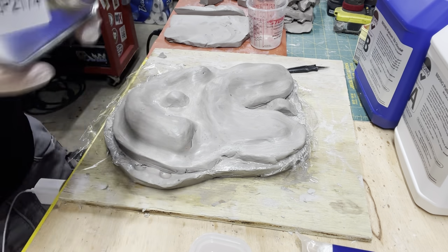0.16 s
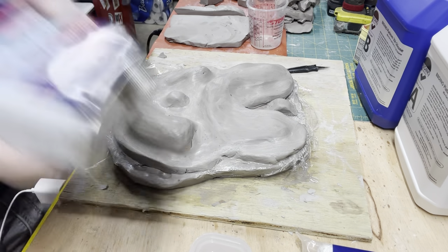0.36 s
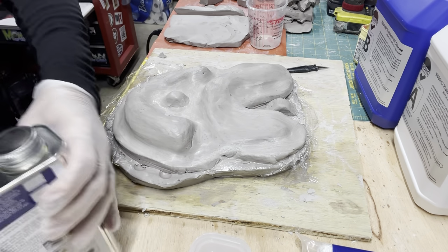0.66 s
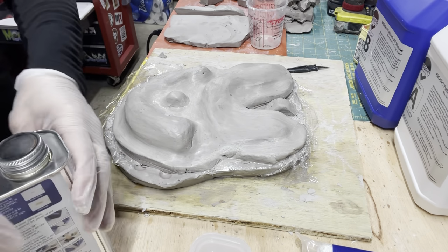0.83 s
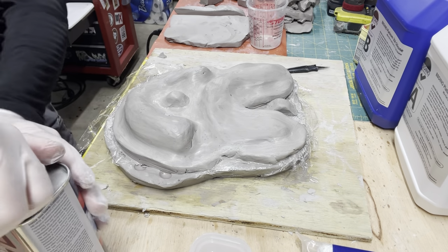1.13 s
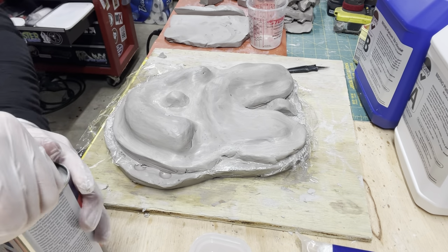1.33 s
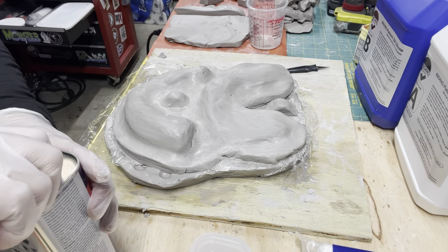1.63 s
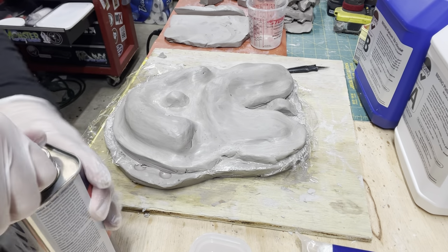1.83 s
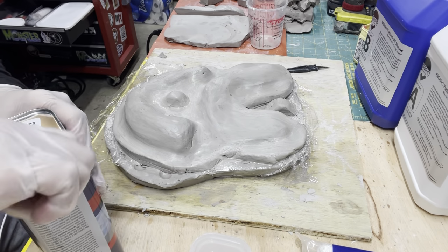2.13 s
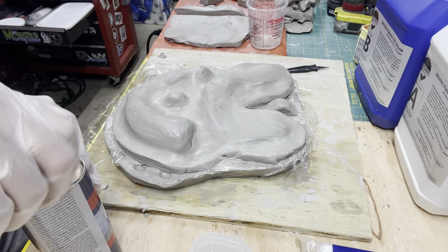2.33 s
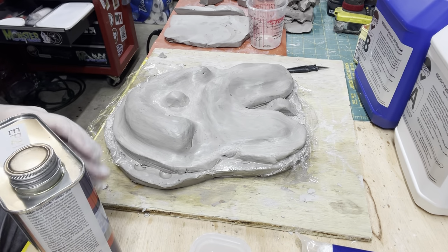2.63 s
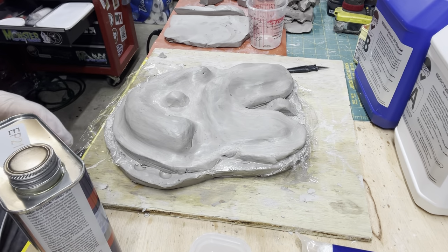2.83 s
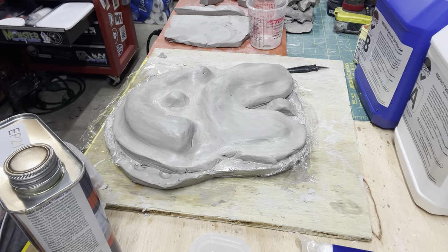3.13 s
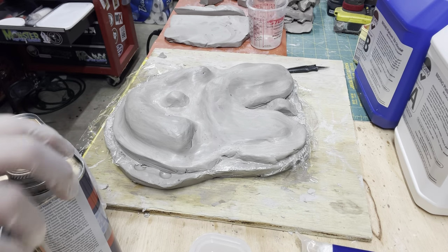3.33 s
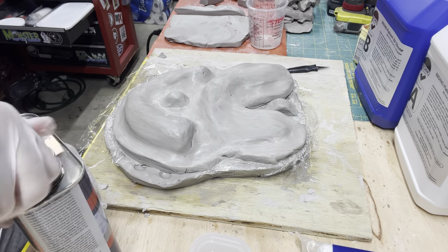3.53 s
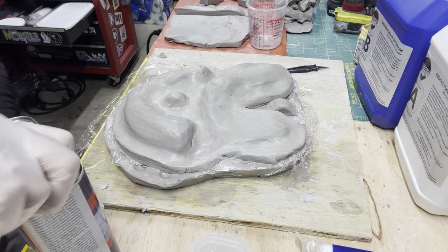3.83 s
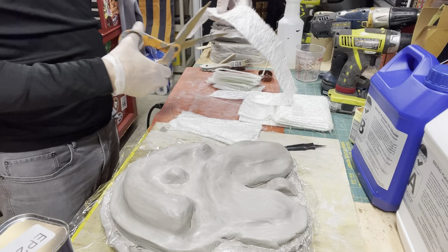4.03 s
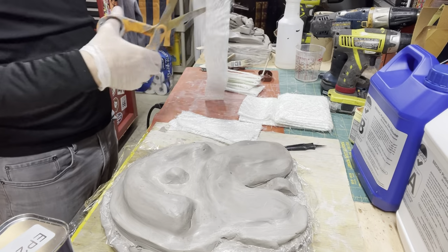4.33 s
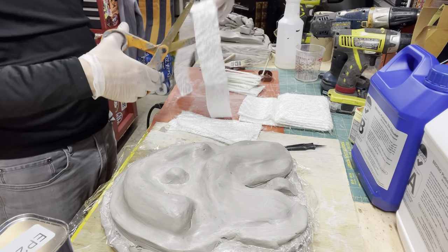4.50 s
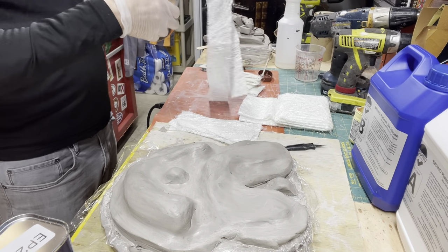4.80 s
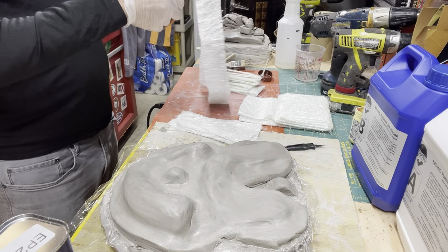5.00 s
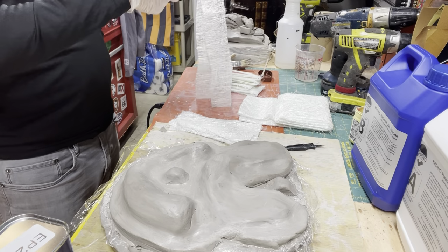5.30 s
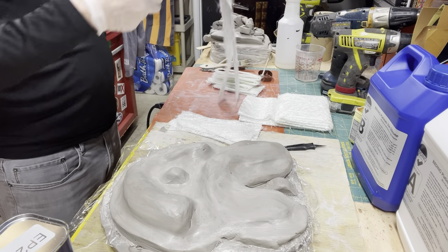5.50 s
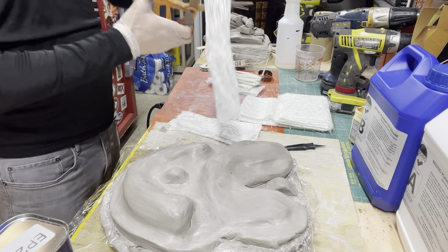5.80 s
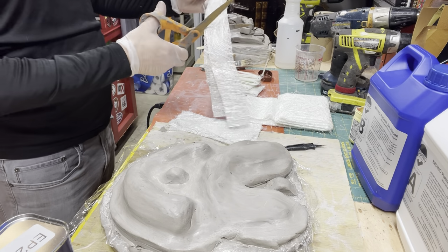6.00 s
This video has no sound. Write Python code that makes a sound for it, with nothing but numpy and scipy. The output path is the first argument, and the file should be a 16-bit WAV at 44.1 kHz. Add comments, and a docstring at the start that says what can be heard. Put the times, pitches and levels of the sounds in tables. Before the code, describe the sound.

For the first second, liquid is shaken in a tin can close to a stereo microphone: quick slaps, splashes and round, hollow gulps, loudest at about 0.7 seconds. It then rocks softly and settles while rubber gloves slide faintly over the tin. From 2.1 to 2.5 seconds a metal screw cap grinds in short turns, with a sharp click near 2.4 and a slight ring from the lid. More clicks and scrapes follow from 3.3 to 3.8 seconds. Just after 4 seconds the can sounds stop abruptly. Faint scissor ticks and a dry, grainy rustle of fibreglass mat take over, building to a brief, crunchy tear with tiny squeaks around 5.3 seconds, far quieter than the sloshing. Another light rasp comes near 6 seconds. The handling sits slightly to the right, and a low, quiet workshop rumble continues underneath.

```python
"""Solvent can and fibreglass mat at a workbench

Close to a stereo microphone, a tin can of solvent is shaken: the liquid slaps its walls and gulps,
then settles with the can upright. Gloved hands shift their grip and work the screw cap, ringing the
lid. After an abrupt change of scene, a strip of fibreglass mat rustles, is torn off and meets the
scissors. Farther off, the workshop rumbles quietly."""
import sys
import numpy as np
from scipy import signal
from scipy.fft import rfft, irfft, next_fast_len
from scipy.io import wavfile
from scipy.ndimage import uniform_filter1d, map_coordinates

SR = 44100
rng = np.random.default_rng(int(sys.argv[2]) if len(sys.argv) > 2 else 0)


def bounce(signal):
    """Save signal as a 16-bit WAV file at the path given by the first command-line argument."""
    frames = np.transpose(np.atleast_2d(signal))
    limited = np.clip(frames, -1, 1)
    pcm = np.round(limited * 32767).astype(np.int16)
    wavfile.write(sys.argv[1], SR, pcm)


N = 271215
T = np.arange(N) / SR
SCENE_CHANGE_S = 4.059
SIDES = np.array([[1], [-1]])   # left, right

# the can turning from its side to upright: t/s, left-right balance/dB, wave swell/s, ring time factor
CAN_POSE = [(0.45, -2.5, 0.0031, 0.4), (0.66, -3.5, 0.0034, 0.91), (0.8, -6, 0.004, 0.93)]
# resonances of the can's lid and neck: f/Hz, width/Hz, gain/dB
LID_RESONANCES = [(268, 88, -0.5), (408, 91, -7.5), (544.5, 99, 4.5), (784, 60, 4), (882, 120, 1),
                  (1178, 170, 1), (1490, 300, -3.5), (1803, 79, -2), (2038, 170, -1.5), (3304, 92, -4),
                  (3608, 370, -10.5), (4760, 89, -5), (8030, 70, -9.5)]


def sloshes(upright_s=.55, full_wave_db=-23, gain_db=-4.5, boom_db=-14.5, thump_db=-4.5, fall_s=.0059):
    """A wave lands as one push inside a swell of droplet impacts; the can rings as it is held."""
    # waves hitting the can: t/s, level/dB, splash re level/dB, spatter re level/dB, fine spray/dB
    waves = [(0.002, -41.5, -12.5, -3, -58), (0.054, -30.5, -2, -14, -73), (0.105, -28.5, -7, -8, -61),
             (0.173, -30, -5.5, -15.5, -43.5), (0.183, -25, -7.5, -12, -49.5),
             (0.223, -31, -3, -9.5, -52.5), (0.230, -24, -6.5, -22, -65.5), (0.293, -39.5, -17, 1.5, -57.5),
             (0.346, -28.5, -2.5, -8, -49), (0.352, -26.5, -11, -22, -58.5), (0.425, -33, -22, -34, -60),
             (0.470, -28, -28, -21, -54.5), (0.479, -39, -14.5, -24, -65.5), (0.613, -39, -4, -19.5, -63),
             (0.659, -24, 1, -15.5, -54.5), (0.662, -14.5, -7.5, -24.5, -50.5),
             (0.676, -28.5, -7, -20, -65.5), (0.684, -33.5, -7.5, -16.5, -65.5),
             (0.699, -41, -8, -15.5, -67.5), (0.78, -26, -17.5, -38, -76), (0.811, -32.5, -23, -38, -63),
             (0.856, -27.5, -13, -39, -56), (0.905, -25, -20, -28.5, -54), (0.951, -54, 3, -28, -73),
             (0.977, -46, -40, -34, -75), (1.239, -50, -18.5, -11.5, -63.5)]
    # modes of the part-filled can in each pose: f/Hz, level/dB, t60/s, balance/dB, left lead/rad
    modes_on_side = [(62, -15, .16, 2, 0), (120.3, -14, .25, 1, .1), (170, -3, 0.0411, 2.5, .1),
                     (216, -0.5, .11, -2.5, 0), (299, 1, 0.2, 0, 0.69), (391.2, -5, 0.14, 4.5, -0.07),
                     (568, -2, 0.11, 0, 0.21), (620, -4, 0.053, -2.5, -0.11), (666, -0.5, 0.032, -4.5, 1.4),
                     (854, -5.5, .05, 2, .4), (1025, -4, 0.056, -5.5, 0.46), (1110, -11.5, 0.03, 2, 0),
                     (1255, -8.5, 0.047, 1, -.2), (1426, -8, .06, -6, -0.027), (1740, -9.5, .05, 0, 0),
                     (1966, -17, 0.043, 0, -.3), (2400, -22.5, 0.065, 0.5, -.5),
                     (2940, -14.5, 0.041, -1, 0), (3340, -21.5, .04, 0, .5)]
    modes_upright = [(63, -14.5, .16, -0.5, -0.5), (92.7, -8.5, 0.097, 0, 0.2), (205, -9, 0.11, 4.5, 0.5),
                     (265.5, -3.5, 0.033, -3.5, 1.5), (374, -5, .065, -2.5, 1.5), (430, -2, 0.079, -3, 0.5),
                     (500, -10, 0.093, -0.5, -2.4), (608, -3.5, 0.058, 2.5, 1.05),
                     (737, 2, 0.033, -0.5, -1.5), (849, -6, 0.043, -1, -2.15), (935, -12, .05, 6, 3),
                     (1010, -15, .06, -1.5, 1), (1120, -9, 0.049, 9.5, 1.5), (1283, -8, 0.033, 0.5, 1),
                     (1650, -12.5, .05, 6, -1), (1710, -19, .055, -1.5, -2.5),
                     (2019, -18.5, 0.032, 2.5, -3), (2318, -14, .06, 1.5, 1.5), (2638, -21.5, .05, 1, -2.5),
                     (2900, -21, 0.074, 2.5, -2.5), (3390, -23, .05, 3, 2)]
    out, size, lead = np.zeros((2, N)), 12288, SR // 40
    t = np.arange(size) / SR
    since = t - lead / SR
    hz = np.fft.rfftfreq(size, 1 / SR) + 1
    edges_hz = [30, 90, 300, 850, 2100, 3900]   # boom, thump, body, splash, spatter
    registers = [1 / np.sqrt((1 + (lo / hz) ** 10) * (1 + (hz / hi) ** 10))
                 for lo, hi in zip(edges_hz, edges_hz[1:])]
    pose_s, *pose = np.transpose(CAN_POSE)
    for s, wave_db, splash_db, spatter_db, spray_db in waves:
        balance_db, swell_s, ring_factor = (np.interp(s, pose_s, column) for column in pose)
        impacts = .17 * rng.standard_normal(size) * swell(since, swell_s, fall_s)
        impacts[lead] += 2   # the main push
        # the many droplets drive all pitches about equally, so the can sets the colour
        push = rfft(impacts)
        push /= np.sqrt(uniform_filter1d(np.abs(push) ** 2, size=91) + 1e-12)
        # a light wave wets and loads another part of the wall each time
        shift = .02 * rng.standard_normal() * (wave_db < full_wave_db)
        modes = modes_on_side if s < upright_s else modes_upright
        struck = rfft(can_walls(t, modes, shift, ring_factor)) * push
        # a broad wave gives a thump, a breaking crest gives splash and spatter
        levels_db = wave_db + gain_db + np.array([boom_db, thump_db, 0, splash_db, spatter_db])
        blow = sum(at_level(irfft(struck * register), db) for register, db in zip(registers, levels_db))
        # the finest droplets tick sharply against the tin
        drops = noise(.64, size) * swell(since, rise_s=.0036, fall_s=.004)
        spray = at_level(band(drops, 3800, 7600), spray_db + gain_db)
        add(out, pan(balance_db) * (blow + spray), s - lead / SR)
    return out


def can_walls(t, modes, shift, ring_factor, detune=.01407, froth_s=.0055):
    """The walls ring under a burst of froth; each mode reaches the two microphone sides in its own way."""
    hz, db, t60_s, balance_db, lead_rad = np.transpose(modes)[:, :, None]
    pitch_hz = hz * (1 + shift + detune * rng.standard_normal(hz.shape))
    strength = from_db(db + 1.3 * rng.standard_normal(hz.shape))
    decay = strength * from_db(-60 * t / (t60_s * ring_factor))
    phase = 2 * np.pi * pitch_hz * t
    tones = [from_db(side * balance_db) * decay * np.sin(phase + side * lead_rad) for side in (.5, -.5)]
    froth = .42 * noise(.84, len(t)) * np.exp(-t / froth_s)
    return np.sum(tones, axis=1) + froth


def gulps(lean_db=3.5, glide=.043, hum_db=-14.5, hum_s=.023):
    """A trapped pocket of air swells into a round, rising tone; the can hums on after it."""
    # air pockets in the liquid, and two hollow knocks as the cap turns (3.43 s, 3.496 s): t/s, f/Hz, level/dB,
    # swell/s
    pockets = [(0.003, 237.1, -26.5, 0.0035), (0.034, 218, -28, 0.0084), (0.061, 202.6, -20.5, 0.0071),
               (0.108, 184.8, -13, 0.0053), (0.138, 208.7, -37, 0.0055), (0.185, 196.7, -13.5, 0.0033),
               (0.228, 252.1, -18, 0.0048), (0.307, 182, -31, 0.0076), (0.346, 239.7, -20.5, 0.0048),
               (0.353, 115, -28.5, 0.018), (0.375, 200, -38, 0.0086), (0.488, 193.7, -26, 0.0099),
               (0.663, 184, -13, 0.006), (0.666, 373.4, -14.5, 0.0087), (0.689, 205.6, -30, 0.0096),
               (0.68, 98.7, -29, 0.0099), (0.784, 261.6, -33, 0.009), (0.811, 106.4, -34, 0.018),
               (0.86, 237, -27, 0.0065), (0.861, 102.5, -29.5, 0.012), (0.913, 403.3, -30.5, 0.0084),
               (0.923, 100.4, -38, 0.018), (0.982, 208.7, -39.5, 0.0075), (1.244, 382, -47.5, 0.01),
               (3.43, 122.3, -43.5, 0.0094), (3.496, 270.7, -45.5, 0.0042)]
    out, since = np.zeros((2, N)), np.arange(-SR // 20, SR // 5) / SR
    pose_s, pose_balance_db = np.transpose(CAN_POSE)[:2]
    for s, hz, db, swell_s in pockets:
        balance_db = lean_db + np.interp(s, pose_s, pose_balance_db)
        shrink = np.tanh(since / swell_s)
        tone = np.sin(2 * np.pi * np.cumsum(hz * (1 + glide * shrink)) / SR + rng.uniform(0, 2 * np.pi))
        gulp = np.exp(-(since / swell_s) ** 2)
        hum = from_db(hum_db) * np.maximum(shrink, 0) * np.exp(-np.abs(since) / hum_s)
        add(out, from_db(db) * (gulp + hum) * tone * pan(balance_db), s + since[0])
    return out


def bubbles(onset_s=.0011, rise_per_s=1.5):
    """Each bubble pops with a few cycles that rise a little in pitch."""
    # bubbles in a breaking crest: t/s, f/Hz, level/dB, decay/s
    pops = [(0.171, 1082, -19, .004), (0.226, 1250, -19.5, 0.0033), (0.3455, 1500, -11.5, 0.0019),
            (0.422, 1380, -40.5, 0.0026), (0.465, 1373, -37, 0.0059)]
    out, t = np.zeros((2, N)), np.arange(SR // 16) / SR
    for s, hz, db, decay_s in pops:
        tone = np.sin(2 * np.pi * hz * t * (1 + rise_per_s * t / 2))
        envelope = (1 - np.exp(-t / onset_s)) * np.exp(-t / decay_s)
        add(out, from_db(db) * envelope * tone * pan(0), s)
    return out


def sway(gain_db=-3):
    """After each jolt the liquid rocks softly against the walls and comes to rest."""
    # jolts of the can: t/s, level/dB
    jolts = [(0, -42.5), (0.66, -46.5), (1.24, -61), (1.87, -54), (2.17, -51.5), (2.679, -74), (3.36, -53)]
    # spectrum of the rocking liquid: f/Hz, level/dB
    colour = [(110, 0), (200, -4.5), (270, -3), (320, -8), (390, 1), (480, -8), (610, -0.5), (760, -14.5),
              (1100, -27.5)]
    power = sum((from_db(db) * swell(T - s, rise_s=.033, fall_s=.51)) ** 2 for s, db in jolts)
    return from_db(gain_db) * np.sqrt(power) * coloured(noise(.84), colour) * pan(-2)


def gloves(rub_db=1.5, tin_db=-2.5):
    """Rubber slides over the tin, which answers faintly."""
    # slides of the gloves: t/s, length/s, rub level/dB, tin offset/dB
    slides = [(0.0, 0.27, -66.5, 4), (0.088, 0.013, -57.5, -23), (0.37, 0.17, -65, 1),
              (0.205, 0.017, -53.5, 9), (0.325, 0.017, -58.5, 7), (0.58, 0.052, -64, 12),
              (0.64, 0.098, -65.5, -6), (0.76, 0.016, -59, -26), (0.845, 0.14, -62, 4),
              (1.03, 0.25, -68, 3), (1.365, 0.1, -62, 1), (1.41, 0.039, -57.5, 1.5),
              (1.48, 0.087, -65.5, 3.5), (1.665, 0.024, -67, 12), (1.705, 0.031, -71.5, 6),
              (1.835, 0.084, -64, 9.5), (1.95, 0.064, -71, -3), (2.057, 0.037, -63, 3),
              (2.11, 0.018, -63, 9), (2.25, 0.13, -68.5, 0), (2.465, 0.036, -71, 16),
              (2.52, 0.085, -75.5, 6), (2.595, 0.04, -64, -5.5), (2.71, 0.028, -61, 4),
              (2.805, 0.0049, -69, -21), (2.925, 0.012, -72, -22), (2.97, 0.017, -88.5, -14),
              (3.03, 0.023, -73.5, -15), (3.155, 0.012, -78, -18), (3.24, 0.0092, -70.5, -8),
              (3.27, 0.11, -72, -10), (3.51, 0.037, -60.5, -17), (3.675, 0.035, -70.5, 10),
              (3.76, 0.023, -62, -1.5), (3.82, 0.11, -71.5, 3), (3.98, 0.042, -63, -2)]
    # spectrum of rubber on tin: f/Hz, level/dB
    colour = [(2000, -7.5), (3000, 2.5), (4500, -1), (6300, 2), (8000, 1.5), (11000, 1.5), (13500, 1.5),
              (15800, -1.5)]
    rub, tin = strokes(slides, attack_s=.0013, build_db=0, release_s=.00538)
    slips = friction(slips_per_s=340, grain_db=1.5, width=.059)
    slips = moving_contact(slips, depth_db=3.5, patch_hz=592.6, hold_s=.067)
    drive = friction(slips_per_s=500, grain_db=4, width=.83)
    hiss = from_db(rub_db) * rub * coloured(slips, colour)
    lid = from_db(tin_db) * tin * unit_power(resonate(drive, LID_RESONANCES))
    return hiss * pan(-3) + lid * pan(-2.5)


def screw_cap(rub_db=-.5):
    """The metal cap grinds round its thread and drives the lid, which the gripping hand damps."""
    # turns of the cap: t/s, length/s, rub level/dB, tin offset/dB
    turns = [(2.146, 0.029, -48, 3), (2.192, 0.023, -42.5, 0), (2.376, 0.019, -51.5, 7.5),
             (2.418, 0.022, -39.5, -4.5), (2.446, 0.017, -53, 6), (3.372, 0.025, -47, 2.5),
             (3.412, 0.019, -43, -0.5), (3.452, 0.028, -48.5, -0.5), (3.566, 0.015, -52, -29),
             (3.6, 0.024, -56, 4), (3.633, 0.025, -50, 1.5), (3.731, 0.015, -53, -15)]
    # spectrum of the thread, and the hand's filtering of the lid: f/Hz, level/dB
    thread_colour = [(1500, -11), (2500, 3.5), (3800, 3.5), (4900, 6.5), (5500, 4), (6300, 6.5),
                     (7700, -0.5), (9000, -18), (10200, 7), (11800, -5), (13600, 1.5), (15800, -6)]
    grip_colour = [(250, -2), (560, -3), (900, -1.5), (1400, 2.5), (2100, 4), (2600, -1.5), (4000, -7),
                   (9000, 4)]
    rub, tin = strokes(turns, attack_s=.003, build_db=2, release_s=.0029)
    slips = friction(slips_per_s=220, grain_db=1.5, width=.67)
    slips = moving_contact(slips, depth_db=7.5, patch_hz=277, hold_s=.035)
    drive = friction(slips_per_s=420, grain_db=2.5, width=.54)
    drive = moving_contact(drive, depth_db=3, patch_hz=180, hold_s=.03)
    hiss = from_db(rub_db) * rub * coloured(slips, thread_colour)
    lid = tin * coloured(resonate(drive, LID_RESONANCES), grip_colour)
    return hiss * pan(-2) + lid * pan(-3)


def fibreglass_mat(fibre_db=4, crunch_db=-7, ring_db=-1.5):
    """Glass fibres brush each other with a grainy rasp and crunch as they part."""
    # pulls and brushes of the mat: t/s, length/s, hiss level/dB, crunch offset/dB
    pulls = [(4.125, .015, -74, -9.5), (4.21, 0.076, -85, -18), (4.39, 0.05, -76, -1.5),
             (4.47, 0.043, -74, -31), (4.54, 0.02, -65, -22.5), (4.788, 0.026, -61, -15.5),
             (4.926, .012, -62.5, -11), (4.947, 0.011, -59, -7), (4.975, 0.031, -63, -5),
             (5.012, 0.016, -59, -6.5), (5.07, 0.015, -67, -5.5), (5.109, 0.011, -61.5, -15),
             (5.145, 0.014, -61, -7.5), (5.186, 0.026, -62.5, -11), (5.222, 0.061, -56, -6.5),
             (5.278, .012, -47, -9), (5.295, 0.017, -42.5, -9), (5.34, 0.062, -70, -1),
             (5.408, 0.013, -48.5, -1.5), (5.48, 0.17, -77.5, -11), (5.69, 0.056, -73, -18),
             (5.82, .06, -78.5, -5), (5.915, 0.023, -64.5, -3), (5.975, 0.025, -58, -3.5),
             (6.005, 0.048, -58.5, 0.5)]
    # spectra of brushing and of parting fibres: f/Hz, level/dB
    fibre_colour = [(2000, -37), (3500, -13), (4300, -7), (5300, -13), (6300, -4), (6850, -7.5),
                    (7400, -1.5), (8300, 2.5), (10000, 0.5), (10500, 1.5), (11100, 2.5), (11900, 3),
                    (12900, -2), (15500, 1)]
    crunch_colour = [(600, 4.5), (1400, -9.5), (2100, 0.5), (2900, 0), (3400, -3.5), (4200, 9), (5300, -17),
                     (9000, -14)]
    # resonances of the crunching strip: f/Hz, width/Hz, gain/dB
    strip_resonances = [(1430, 89, -17), (2720, 110, -3), (3300, 740, 0), (3770, 310, 2), (4314, 220, -4),
                        (6740, 960, -4.5)]
    fibres, crunch = strokes(pulls, attack_s=.003, build_db=.5, release_s=.011)
    rasp = friction(slips_per_s=330, grain_db=3.5, width=.25) + crackle(snaps_per_s=800, spread_db=3.5)
    brushing = moving_contact(rasp, depth_db=4, patch_hz=330, hold_s=.046)
    parting = noise(.69) + 1.5 * crackle(snaps_per_s=520, spread_db=3.2)
    parting = moving_contact(parting, depth_db=4, patch_hz=281, hold_s=.044)
    flexing = moving_contact(crackle(snaps_per_s=600, spread_db=3), depth_db=4, patch_hz=300, hold_s=.04)
    hiss = from_db(fibre_db) * fibres * coloured(brushing, fibre_colour)
    snaps = from_db(crunch_db) * crunch * coloured(parting, crunch_colour)
    ring = from_db(ring_db) * crunch * unit_power(resonate(flexing, strip_resonances))
    return hiss * pan(-2) + (snaps + ring) * pan(-3.5)


def knocks(gain_db=-1, rise_s=.0036):
    """Cap, fingers and scissors make short scuffing contacts: a bright tick over a hollow knock."""
    # light contacts: t/s, knock level/dB, low edge/Hz, high edge/Hz, tick level/dB, decay/s
    touches = [(1.054, -57, 185, 2750, -53, 0.0069), (2.11, -55, 550, 1800, -69, 0.0075),
               (2.274, -55.5, 700, 1500, -78, 0.0055), (2.36, -35, 550, 1400, -37.5, 0.0052),
               (2.714, -46.5, 635, 870, -68.5, 0.0023), (2.814, -59, 185, 594, -79, 0.0068),
               (3.237, -73.5, 900, 2200, -59.5, 0.018), (3.341, -46, 596, 1250, -61, 0.0042),
               (3.369, -41.5, 1160, 2390, -37.5, 0.007), (3.513, -56, 1820, 3800, -66, 0.009),
               (3.736, -58, 1920, 4200, -58, 0.01), (3.761, -55.5, 352, 1106, -56, 0.0097),
               (4.315, -73.5, 186, 2990, -69, 0.0056), (4.386, -62, 185, 1790, -67, 0.014),
               (5.108, -84, 186, 3090, -68.5, 0.0038), (5.611, -79.5, 185, 2970, -60.5, 0.0071)]
    out, lead = np.zeros((2, N)), SR // 100
    since = (np.arange(SR // 8) - lead) / SR
    for s, knock_db, lo_hz, hi_hz, tick_db, decay_s in touches:
        contact = noise(.74, len(since)) * swell(since, rise_s, decay_s)
        on_can = s < SCENE_CHANGE_S
        struck = resonate(contact, LID_RESONANCES) + .56 * contact if on_can else contact
        knock = at_level(band(struck, lo_hz, hi_hz), knock_db + gain_db)
        tick = at_level(band(contact, 4700, 13200), tick_db + gain_db)
        add(out, knock + tick, s - lead / SR)
    return out * pan(-2)


def squeaks():
    """The cap's thread or the parting strip sticks, slips and chirps for an instant."""
    # stick-slip chirps: t/s, f/Hz, half width/Hz, level/dB, rise and decay/s
    chirps = [(4.051, 2860, 231, -54, 0.0031), (4.956, 1856, 121, -78, 0.009),
              (5.309, 1425, 130, -62, 0.016), (5.41, 2740, 130, -56.5, 0.0066),
              (5.418, 1525, 141.5, -60, 0.0096), (5.71, 1234, 202, -77, 0.0075),
              (5.751, 2017, 260, -76, 0.012)]
    out, since = np.zeros((2, N)), np.arange(-SR // 10, SR // 10) / SR
    for s, hz, half_hz, db, fade_s in chirps:
        chirp = band(noise(.32, len(since)), hz - half_hz, hz + half_hz)
        add(out, at_level(chirp * swell(since, fade_s, fade_s), db), s + since[0])
    return out


def strokes(rows, attack_s, build_db, release_s):
    """Each stroke sets in, gains build_db with the pressure and lets go; gives hiss and body gains."""
    power = np.zeros((2, N))
    for start_s, length_s, db, offset_db in rows:
        span = slice(max(int((start_s - .1) * SR), 0), int((start_s + length_s + .2) * SR))
        since = T[span] - start_s
        ease_s = .21 * min(length_s, .15)   # a long stroke starts and ends more gently
        onset = since / (attack_s + ease_s)
        release = (length_s - since) / (release_s + ease_s)
        edges = np.exp(np.minimum(np.minimum(onset, release), 0))
        pressure = from_db(build_db * (np.clip(since / length_s, 0, 1) - 1.5))
        power[:, span] += (from_db([[db], [db + offset_db]]) * edges * pressure) ** 2
    return np.sqrt(power)


def friction(slips_per_s, grain_db, width):
    """Countless tiny slips: noise whose strength changes from one catch to the next."""
    catches_s = np.cumsum(rng.exponential(1, 20000)) / slips_per_s
    hiss = noise(width)
    strength = np.clip(rng.standard_normal(len(catches_s)), -2, 2)
    return unit_power(hiss * from_db(grain_db * np.interp(T, catches_s, strength)))


def crackle(snaps_per_s, spread_db):
    """Single fibres snap at random: lone clicks of uneven size, each from its own direction."""
    snapping = rng.random(N) < snaps_per_s / SR
    sizes = from_db(spread_db * np.minimum(rng.exponential(1, N), 3))
    clicks = snapping * sizes * rng.choice([-1, 1], N)
    return unit_power(clicks * (1 + .89 * rng.standard_normal(N) * SIDES))


def moving_contact(x, depth_db, patch_hz, hold_s):
    """The point of contact moves, so patches of the spectrum grow and fade, each on its own."""
    hz, s, frames = signal.stft(x, SR, nperseg=512)
    patches = rng.standard_normal((300, 700))
    grid = np.meshgrid(hz / patch_hz, s / hold_s, indexing="ij")
    swing = map_coordinates(patches, grid, order=1, mode="mirror")
    _, shifted = signal.istft(frames * from_db(depth_db * swing), SR)
    return unit_power(shifted[:, :N])


def resonate(x, resonances):
    """A body's resonances ring in parallel, with alternating signs."""
    out = 0
    for k, (hz, width_hz, db) in enumerate(resonances):
        radius = np.exp(-np.pi * width_hz / SR)
        gain = (1 - radius ** 2) / 2
        feedback = [1, -2 * radius * np.cos(2 * np.pi * hz / SR), radius ** 2]
        out += (-1) ** k * from_db(db) * signal.lfilter([gain, 0, -gain], feedback, x)
    return out


def room(x, wet_db=-23, top_hz=5000, t60_s=.25, delay_s=.008):
    """The workshop returns a short diffuse tail, different on each side."""
    t = np.arange(SR // 2) / SR
    tail = band(rng.standard_normal((2, len(t))), 80, top_hz) * from_db(-60 * t / t60_s) * (t > delay_s)
    tail /= np.sqrt(np.sum(tail ** 2) * SR / (4 * top_hz))   # about unit gain within the band
    return from_db(wet_db) * signal.fftconvolve(x, tail, axes=1)[:, :N]


def workshop(rumble_db=-55, air_db=-76):
    """Room tone: a low rumble to the right, a faint hollow rush that swells, and a trace of hiss."""
    # spectrum of the rumble: f/Hz, level/dB
    rumble_colour = [(20, -24), (42, -4), (64, 1), (105, -7), (135, -17.5), (200, -14.5), (300, -21),
                     (400, -21), (480, -25), (650, -30), (830, -44.5), (1300, -47), (2500, -68.5)]
    # the rush: crest t/s, half length/s, low edge/Hz, high edge/Hz, crest level/dB
    rush_shape = (7.5, 1.77, 589.5, 745, -69.5)
    crest_s, half_s, lo_hz, hi_hz, crest_db = rush_shape
    rumble = from_db(rumble_db) * coloured(noise(.2), rumble_colour) * pan(-4.5)
    rush_gain = from_db(crest_db) * np.exp(-((T - crest_s) / half_s) ** 2)
    rush = rush_gain * unit_power(band(noise(1), lo_hz, hi_hz))
    air = coloured(noise(1), [(700, 8), (1500, -5.5), (4000, -9), (11000, -3.5), (16000, -9.5)])
    return rumble + rush + from_db(air_db) * air


def wavering_tone(unsteady=.036, flutter_per_s=80, flutter_db=2.5):
    """A faint tone wavers in pitch and level inside the rush."""
    # course of the tone: t/s, f/Hz, level/dB
    course = [(5.26, 732, -84.5), (5.31, 726, -64), (5.37, 715, -87), (5.46, 733, -67.5),
              (5.55, 677, -84.5), (5.78, 638, -83), (5.84, 622, -67), (5.87, 639, -78), (5.904, 657, -62.5),
              (5.969, 626, -80.5)]
    s, hz, db = np.transpose(course)
    wobble, flutter = (np.interp(T * flutter_per_s, np.arange(1000), steps)
                       for steps in rng.standard_normal((2, 1000)))
    pitch_hz = np.interp(T, s, hz) * (1 + unsteady * wobble)
    level_db = np.interp(T, s, db, left=-np.inf, right=-np.inf) + flutter_db * flutter
    tone = np.sqrt(2) * np.sin(2 * np.pi * np.cumsum(pitch_hz) / SR)
    return from_db(level_db) * tone * pan(-2.5)


def noise(width, size=N):
    """Stereo white noise: a common part plus an opposed part scaled by width."""
    mid, side = rng.standard_normal((2, size))
    return unit_power(mid + width * side * SIDES)


def coloured(x, points):
    """Shape by a spectrum (f/Hz, level/dB) that rolls off past its ends; unit power."""
    hz, db = np.transpose(points)
    size = next_fast_len(N, True)
    bins = np.maximum(np.fft.rfftfreq(size, 1 / SR), 1)
    shape = from_db(np.interp(np.log(bins), np.log(hz), db))
    shape /= np.sqrt((1 + (.7 * hz[0] / bins) ** 6) * (1 + (.7 * bins / hz[-1]) ** 6))
    return unit_power(irfft(rfft(x, size) * shape, size)[:, :N])


def band(x, lo_hz, hi_hz):
    """Causal band-pass."""
    return signal.sosfilt(signal.butter(2, [lo_hz, hi_hz], "band", fs=SR, output="sos"), x)


def swell(since, rise_s, fall_s):
    """Exponential rise to 1 at time zero, then exponential fall."""
    return np.exp(np.minimum(since / rise_s, -since / fall_s))


def from_db(db):
    """Decibels to gain."""
    return 10 ** (np.asarray(db) / 20)


def unit_power(x):
    """Scale to a mean square of 1."""
    return x / np.sqrt(np.mean(x ** 2) + 1e-20)


def at_level(x, db):
    """Scale a blow so that its loudest 12 ms have the given level."""
    power = uniform_filter1d(np.mean(x ** 2, axis=0), size=530)
    return x * from_db(db) / np.sqrt(power.max() + 1e-20)


def pan(balance_db):
    """Left and right gains; a positive balance leans left."""
    return from_db(SIDES * balance_db / 2)


def add(out, x, start_s):
    """Mix a short stereo sound in at a given time."""
    i = round(start_s * SR)
    x = x[:, max(-i, 0):N - i]
    out[:, max(i, 0):max(i, 0) + x.shape[1]] += x


def scene():
    """The can breaks off at the change of scene, where the level dips briefly; then the mat is handled."""
    can = sloshes() + gulps() + bubbles() + sway() + gloves() + screw_cap()
    bench = can * (T < SCENE_CHANGE_S) + knocks() + squeaks() + fibreglass_mat()
    dip = np.interp(T - SCENE_CHANGE_S, [-.002, 0, .005, .025], [1, .1, .2, 1])
    return dip * (bench + room(bench) + workshop() + wavering_tone())


def record(dry, mono_above_hz=7500, cutoff_hz=15850):
    """In the treble both microphones carry the same sound, drifting apart in phase; the top is cut."""
    # phase by which the left microphone leads: f/Hz, lead/rad
    left_lead = [(0, 0), (500, 0), (2200, .4), (6000, .3), (8750, 3.14), (11500, 6.28), (14350, 9.42),
                 (16000, 11)]
    hz = np.maximum(np.fft.rfftfreq(N, 1 / SR), 1)
    left, right = rfft(dry)
    mid = (left + right) / 2
    side = (left - right) / 2 / np.sqrt(1 + (hz / mono_above_hz) ** 16)
    lead_rad = np.interp(hz, *np.transpose(left_lead))
    pair = (mid + SIDES * side) * np.exp(.5j * lead_rad * SIDES)
    return irfft(pair / np.sqrt(1 + (hz / cutoff_hz) ** 400), N)


dry = scene()
out = record(dry)
bounce(out)
```